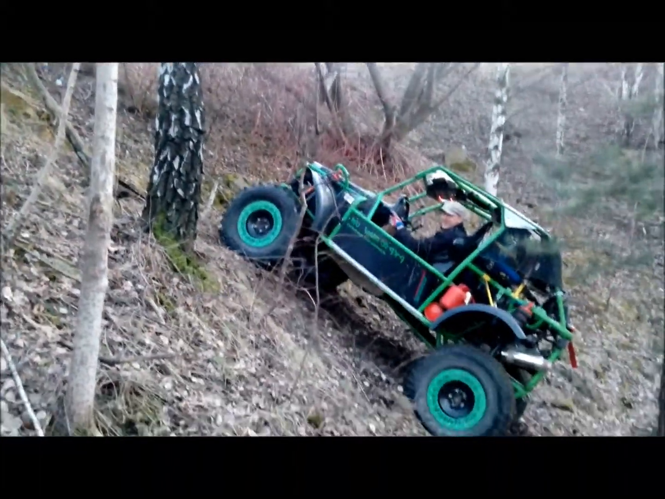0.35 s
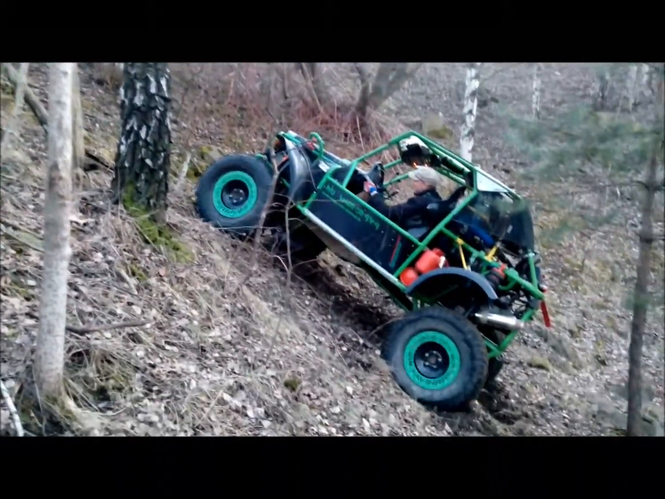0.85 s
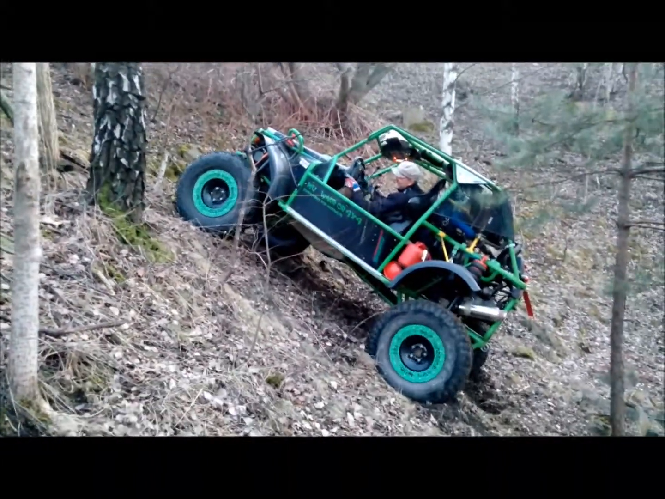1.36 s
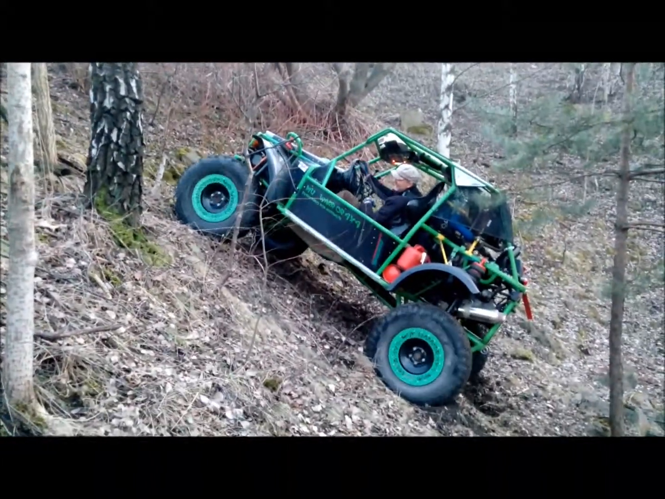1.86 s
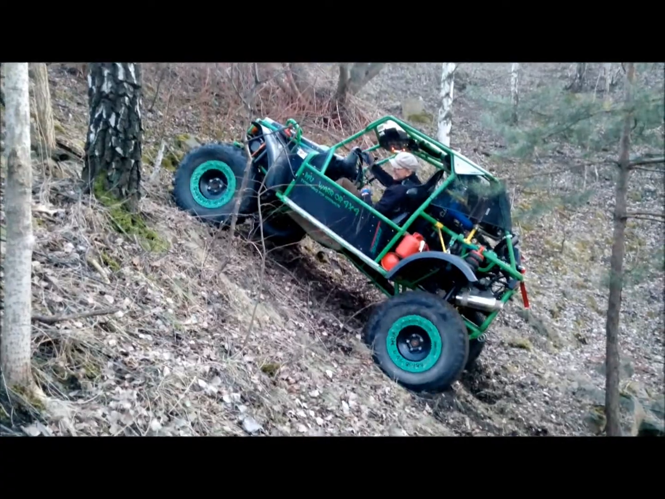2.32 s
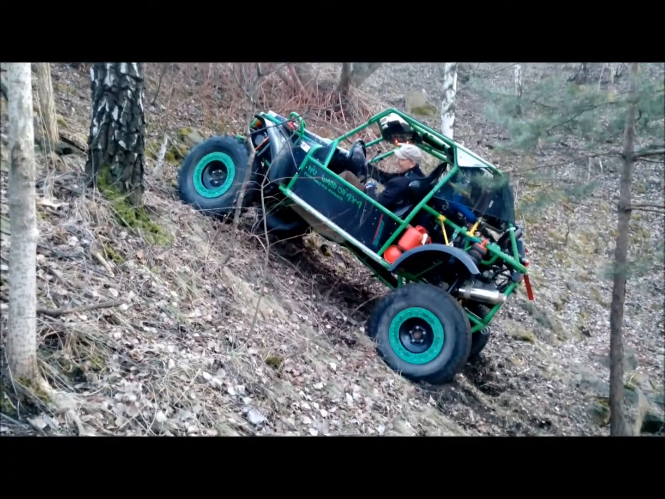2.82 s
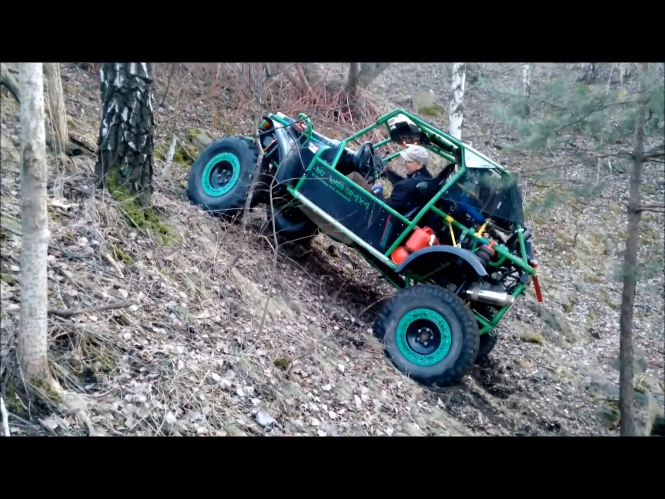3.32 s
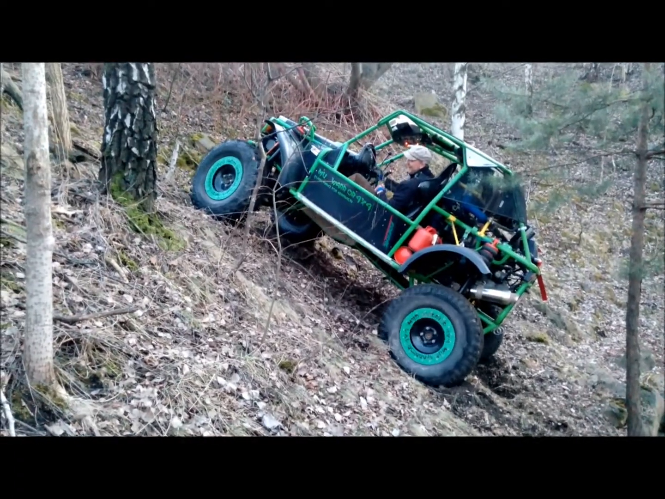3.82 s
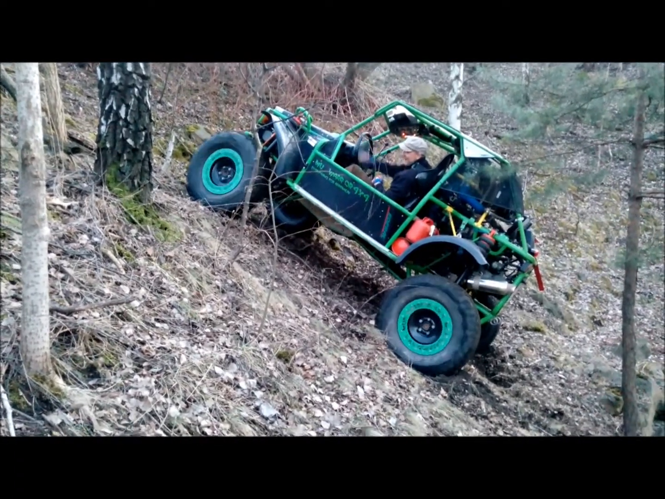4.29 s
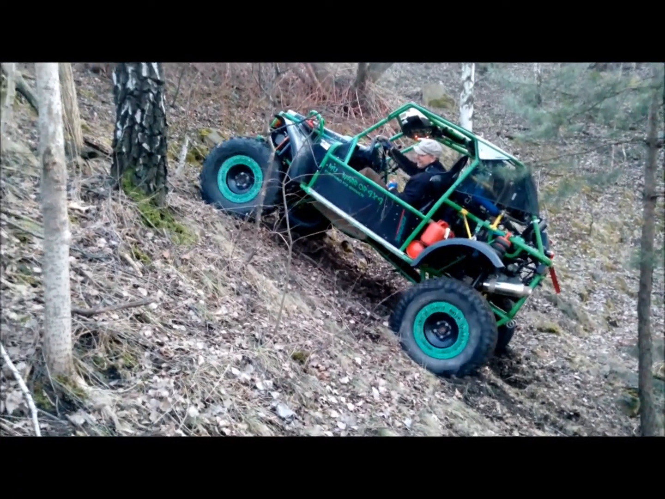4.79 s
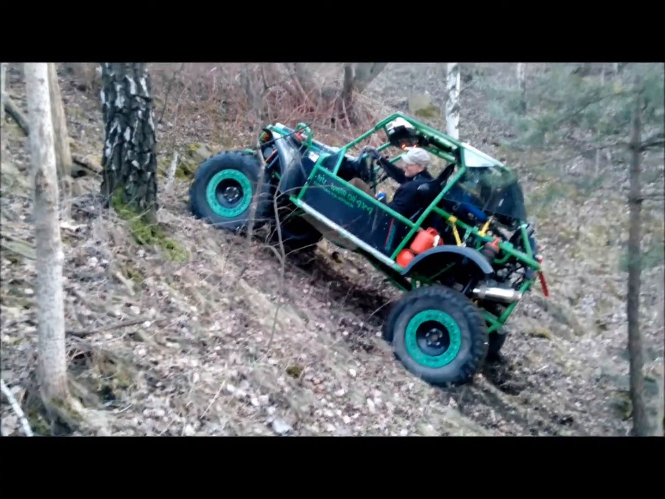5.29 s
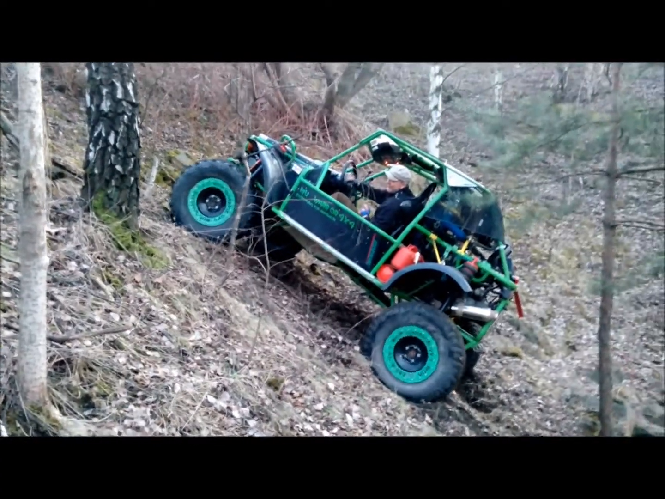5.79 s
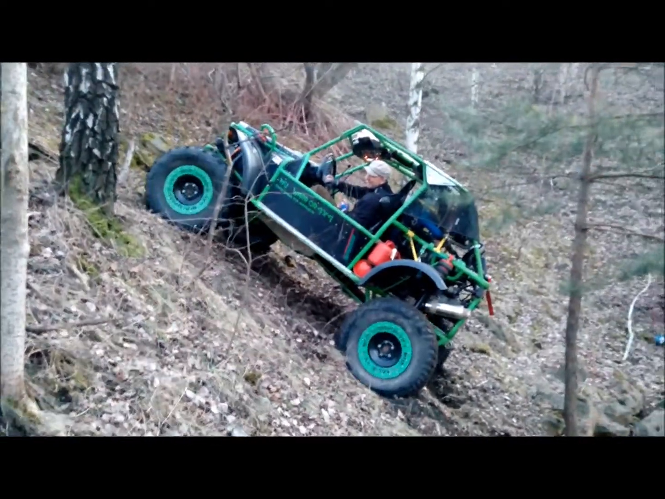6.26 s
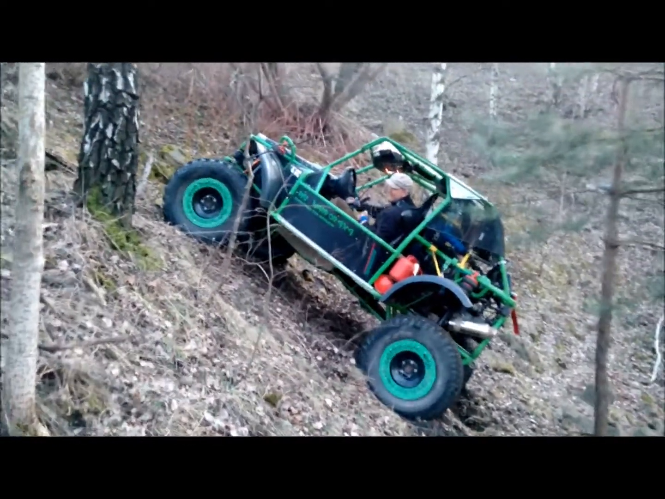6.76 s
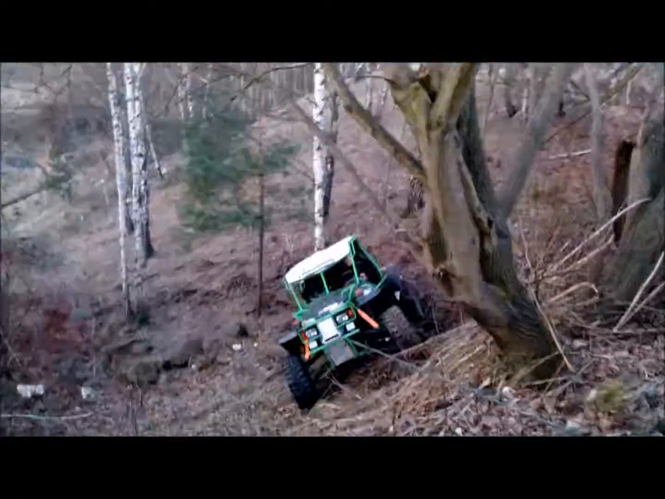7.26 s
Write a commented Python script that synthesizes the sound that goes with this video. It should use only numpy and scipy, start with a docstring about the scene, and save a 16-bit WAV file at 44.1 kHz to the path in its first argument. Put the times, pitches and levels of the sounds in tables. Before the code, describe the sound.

Starting already at high revs, an off-road engine drops, then climbs in several throttle surges, loudest around two to three seconds. Between them it slackens into slow, lumpy firing with clattering, ticking metal and thin gear whine. Later blips are shorter, and the rattle is more exposed. Loose metal knocks occur near the middle. Close outdoor mono microphone, brief tree reflections, soft treble hiss, sudden stop.

```python
"""A four-cylinder off-road buggy is blipped in surges on a steep wooded slope, a few metres away.
Each firing sends an impulse through the silencer's filter and bursts a puff of noise for the gas.
Random ticks and tooth tones drive the resonances of the rattling block; tooth overtones make a gear whine.
One firing count times all engine parts; sparse echoes, low rumble, loose knocks and a steady hiss surround it."""
import sys
import numpy as np
from scipy import signal
from scipy.io import wavfile
from scipy.ndimage import uniform_filter1d

SR = 44100
rng = np.random.default_rng(int(sys.argv[2]) if len(sys.argv) > 2 else 0)


def digitize_waveform(pressure):
    """Quantize a signal to 16-bit integers and store it at the path in sys.argv[1].

    Rows of a 2-D input are taken as channels; values are limited to [-1, 1].
    """
    field = np.atleast_2d(pressure).T
    bounded = np.clip(field, -1, 1)
    quanta = np.round(bounded * 32767).astype(np.int16)
    wavfile.write(sys.argv[1], SR, quanta)


def boost_factor(decibels):
    """Convert a level in decibels to a linear amplitude factor."""
    exponent = np.asarray(decibels, float) / 20
    return 10 ** exponent


N = 325438  # samples

TEETH_PER_FIRING = 5.75  # gear teeth that mesh in one firing interval


def evened(x):
    """Power normalisation: scales to rms 1."""
    return x / np.sqrt(np.mean(x ** 2) + 1e-20)


def read(points, hz):
    """Interpolates a spectrum on a log-frequency axis."""
    f, value = np.transpose(points)
    return np.interp(np.log(hz + 1), np.log(f + 1), value)


def colour(x, points):
    """Minimum-phase filter: the phase of a causal response follows from its log gain."""
    log_gain = np.log(boost_factor(read(points, abs(np.fft.fftfreq(2 ** 14, 1 / SR)))))
    spectrum = np.exp(np.conj(signal.hilbert(log_gain)))
    taps = np.fft.ifft(spectrum).real[:2 ** 12]
    return signal.oaconvolve(x, taps)[:N]


def resonate(x, hz, width):
    """Resonance of gain 1 by heterodyning: shifts hz down to zero, smooths, and shifts back."""
    turn = np.exp(2j * np.pi * np.cumsum(hz * np.ones(len(x))) / SR)
    r = np.exp(-np.pi * width / SR)
    return 2 * (turn * signal.lfilter([1 - r], [1, -r], x / turn)).real


def wander(seconds):
    """Slow random fluctuation of rms 1: white noise averaged twice over a window."""
    window = int(seconds * SR)
    return evened(uniform_filter1d(uniform_filter1d(rng.standard_normal(N), window), window))


def obey(law, thump_db, speed):
    """Source-strength law: the level of a layer follows load, speed and acceleration."""
    mid_speed, mid_thump_db = 45, -25  # firings per s and load at which the law gives its first column
    db, per_load, per_speed, per_gain = law
    gain = uniform_filter1d(np.gradient(speed) * SR, SR // 20)  # firings/s gained each s
    speed_db = 20 * np.log10(speed / mid_speed)
    return db + per_load * (thump_db - mid_thump_db) + per_speed * speed_db + per_gain * gain


def air(t):
    """Stationary filtered noise makes a steady treble hiss; one decaying noise burst makes a thin tick."""
    # spectrum of the hiss: hz, relative_db (per Hz)
    hiss_points = [(5000, -32), (7500, -1), (10000, -9), (13000, -13), (15600, -22)]
    # the tick in the top treble: start_s, peak_db, pitch_hz, t60_s
    tick_row = (7.056, -46, 14000, .02)
    s, db, hz, t60 = tick_row
    burst = rng.standard_normal(N) * (t > s) * boost_factor(-60 * abs(t - s) / t60)
    tick = resonate(burst, hz, .2 * hz)
    hiss = evened(colour(rng.standard_normal(N), hiss_points))
    return boost_factor(-73.5) * hiss + boost_factor(db) * tick / abs(tick).max()


def trees(x):
    """Scattering: sparse echoes from trunks and slope, as convolution with decaying random impulses."""
    t = np.arange(SR // 2) / SR
    sparse = (rng.random(len(t)) < .04) * (t > .008)  # the first echo comes after 8 ms
    taps = rng.choice([-1., 1.], len(t)) * sparse * boost_factor(-60 * t / 0.071)  # t60 71 ms
    return signal.oaconvolve(x, taps / np.linalg.norm(taps))[:N]


def slope(x):
    """Interference: the echo off the slope cancels a band of the treble."""
    # gain of direct sound plus echo: hz, gain_db
    slope_points = [(3000, 1.5), (3750, -2.5), (4150, -6), (4600, -8), (5500, -4)]
    return colour(x, slope_points)


def rumble(thump_db):
    """Turbulent gas buffeting: noise through two low resonances, stronger under load."""
    centre_hz, width_hz = 27, 22
    lumps = resonate(resonate(rng.standard_normal(N), centre_hz, width_hz), centre_hz, width_hz)
    return boost_factor(0.63 * thump_db - 27.0 + 4.0 * wander(0.019)) * evened(lumps)


def knocks():
    """Impact response of loose metal: each knock is a short crack of noise that rings briefly."""
    # loose metal knocks: start_s, peak_db (ahead of echoes and slope), ring_hz
    knock_rows = [(1.4894, -39, 2560), (4.171, -36, 3410), (4.2038, -32, 3364), (5.6491, -38, 2660)]
    out, t = np.zeros(N + 4000), np.arange(4000) / SR
    for s, db, hz in knock_rows:
        crack = rng.standard_normal(4000) * boost_factor(-60 * t / 0.014)
        tail = .4 * np.sin(2 * np.pi * hz * t) * boost_factor(-60 * t / .06)
        ring = resonate(resonate(crack, hz, .2 * hz), hz, .3 * hz) + tail
        out[round(s * SR):][:4000] += boost_factor(db) * ring / abs(ring).max()
    return out[:N]


def overtone(turns, multiple, db, waver_db):
    """Mesh harmonic: one overtone of the tooth rate, wavering in strength and phase."""
    phase = 2 * np.pi * TEETH_PER_FIRING * round(multiple) * turns + 1.7 * wander(.008)
    return np.sqrt(2) * boost_factor(db + waver_db * wander(0.027)) * np.cos(phase)


def whine(speed, turns):
    """Order tracking through a fixed filter: tooth overtones sing where the casing favours them."""
    # the three strong overtones of the tooth rate: multiple, relative_db
    strong_overtones = [(6, -2), (8, 1.5), (10, -6)]
    # what the gear casing lets out, ahead of the load law: hz, gain_db
    casing_points = [(900, -63.5), (1300, -63.5), (1500, -62.5), (1700, -52.5), (1850, -55), (2100, -53),
                     (2350, -58.5), (2570, -52.5), (2750, -67), (3200, -60), (3480, -50), (3700, -67)]
    out = np.zeros(N)
    for k, db in strong_overtones:
        casing_db = read(casing_points, TEETH_PER_FIRING * round(k) * speed)
        out += overtone(turns, k, db + casing_db, 4.7)
    return out


def block(drive, flicker_db):
    """Modal resonance: the block rings at its own pitches, each coming and going."""
    # ringing parts of the block: pitch_hz, width_hz, relative_db
    block_modes = [(508, 28, -8.5), (973, 130, -8.5), (1654, 23, -2), (2054, 150, 0.5), (2248, 37, -9.5),
                   (2650, 220, -8.5), (3370, 130, -5), (3720, 65, -10.5), (4670, 57, -14), (4730, 54, -23),
                   (5140, 34, -25), (5650, 52, -16), (7340, 130, -8.5), (8000, 90, -37), (9200, 120, -30)]
    rings = np.zeros(N)
    for hz, width, db in block_modes:
        rings += boost_factor(db + flicker_db * wander(0.073)) * resonate(drive, hz, width) * np.sqrt(SR / width)
    # the block's ringing holds nothing above about 10 kHz
    return evened(signal.sosfilt(signal.butter(6, 9800, fs=SR, output="sos"), rings))


def rattle(turns, rattle_db):
    """Random impact excitation: dense ticks, bunched by the firing cycle, and tooth tones ring the block."""
    # spectrum of the rattle's hiss: hz, relative_db
    rattle_points = [(140, -31.5), (230, 2), (390, -11), (580, -3.5), (680, -11), (1000, -14),
                     (1300, -13.5), (1750, -8), (2900, -20.5), (4000, -19.5), (4750, -6), (5800, -5),
                     (6600, -18), (8100, -29), (12000, -88), (16000, -83)]
    # faint overtones of the tooth rate: multiple, relative_db
    faint_overtones = [(7, 0), (11, 1.5), (14, -1.5), (15, 0.5), (16, 1.5), (17, -11), (18, -0.5),
                       (20, -12), (22, 2), (24, -7)]
    beat = 1 + 0.17 * np.cos(2 * np.pi * (turns - .12))
    sizes = boost_factor(1.3 * np.minimum(rng.exponential(1, N), 4))
    struck = rng.random(N) < 1200 / SR  # 1200 ticks per s on average
    ticks = evened(struck * sizes * rng.choice([-1., 1.], N) * beat)
    mesh = evened(sum(overtone(turns, k, db, 4.4) for k, db in faint_overtones))
    hiss = colour(beat * rng.standard_normal(N) + 0.13 * ticks + 0.37 * mesh, rattle_points)
    rings = block(ticks + .15 * mesh, 4.0)
    return boost_factor(rattle_db) * (boost_factor(4.5) * evened(hiss) + boost_factor(-5.5) * rings)


def boom(speed, turns):
    """Forced resonance: the body booms at the firing rate, its level and phase lag set by speed alone."""
    # body boom: firings_per_s, level_db (rms)
    boom_points = [(41, -52), (45, -53), (48, -33), (55, -26.5), (63, -32)]
    lag = (speed - 45) * .019  # firing intervals, growing as the speed climbs through the resonance
    tone = np.sqrt(2) * boost_factor(read(boom_points, speed)) * np.cos(2 * np.pi * (turns - lag))
    return tone * np.clip((speed - 34) / 7, 0, 1)  # silent near idle


def rasps(t):
    """Jet-noise surges: short spells of rougher gas change the dB of puff and fizz, fading in and out."""
    # spells of rougher gas: start_s, length_s, puff_change_db, fizz_change_db
    rasp_rows = [(-.05, 0.1, 8.5, 16), (2.08, 0.207, 2.5, 7), (2.885, 0.13, 3, 10.5), (3.966, 0.12, 6, 3),
                 (4.54, 0.046, 1.5, 4), (5.643, 0.052, 2.5, 6), (6.472, 0.23, 3.5, -3)]
    edge_s = 0.034
    start, length, *change = np.transpose(rasp_rows)
    inside_s = np.minimum(t[:, None] - start, start + length - t[:, None])
    on = np.clip(inside_s / edge_s + .5, 0, 1)
    return np.array(change) @ on.T


def puffs(since, firing, puff_db, fizz_db, spread):
    """Pulsed jet noise: gas bursts as each valve opens, dies in a few ms and shakes the block."""
    # spectrum of the puff: hz, relative_db (per Hz)
    puff_points = [(140, -35), (230, 4.5), (330, -8), (408, -4), (443, -4), (505, 1.5), (656, -1.5),
                   (1000, -5), (1440, -12.5), (1670, -8.5), (2810, -22.5), (3480, -10), (4240, -32.5),
                   (5980, -13), (11500, -36), (15000, -65), (22000, -120)]
    # spectrum of the fizz in its treble: hz, relative_db (per Hz)
    fizz_points = [(7000, -57), (10500, 2.5), (12000, -1), (14400, -1), (15600, -10)]
    late = np.maximum(since - .0004, 0)  # s, counted from 0.4 ms after the firing
    burst = late / .0008 * np.exp(-late / .002) * boost_factor(2.2 * spread[firing])
    gas = evened(.19 + burst) * rng.standard_normal(N)
    # the repeatable crack of the valve gives a few clear harmonics
    gas -= 0.5 * evened(np.diff(firing, prepend=0) * 1.)
    sharp = evened(0.061 + burst ** 2.43) * rng.standard_normal(N)
    bark = evened(colour(gas, puff_points)) + boost_factor(-6.5) * block(sharp, 3.0)
    fizz = evened(colour(sharp, fizz_points))
    return bark * boost_factor(puff_db - 2.0) + fizz * boost_factor(fizz_db + 4.5)


def thumps(firing, speed, thump_db, spread):
    """Impulse response: one negative pressure impulse per firing through the silencer; weak ones are uneven."""
    # strength of each cylinder in firing order, at light load: relative_db
    cylinder_db = [-4.7, -6.5, -2.3, -3.4]
    # silencer and pipe, as heard on one thump: hz, relative_db
    silencer_points = [(12, 1), (30, -24), (45, -11), (56, -0.5), (70, 6), (85, 6), (100, 5.5), (130, 2),
                       (155, 3.5), (185, -7), (210, -12), (270, -43.5), (400, -29.5), (900, -106),
                       (3000, -100)]
    at = np.flatnonzero(np.diff(firing, prepend=0))
    light = np.clip((-19 - thump_db[at]) / 9, .12, 1)  # 1 at light load
    uneven_db = np.take(cylinder_db, firing[at] % 4) + 2.96 * spread[firing[at]]
    kick = np.zeros(N)
    kick[at] = -boost_factor(thump_db[at] + light * uneven_db)
    kick /= np.sqrt(speed)  # same power whatever the rate
    return boost_factor(68) * colour(kick, silencer_points)


def scene():
    """Phase locking: all engine parts share one crankshaft, counted in firing intervals."""
    # engine speed ahead of smoothing: time_s, firings_per_s
    speed_points = [(0.0, 61.96), (0.37, 42.77), (0.58, 40.22), (1.3, 55.75), (1.55, 55.82), (1.83, 35.92),
                    (2.0, 36.97), (2.23, 62.4), (2.37, 62.33), (2.62, 46.16), (2.79, 46.91), (2.99, 64.59),
                    (3.22, 54.91), (3.37, 41.81), (3.73, 29.13), (4.1, 27.33), (4.25, 31.35), (4.47, 46.87),
                    (4.69, 53.63), (5.45, 26.85), (5.8, 45.03), (6.23, 23.87), (6.41, 26.23), (6.79, 49.78),
                    (7.15, 29.99), (7.38, 39.86)]
    # how hard the engine fires: time_s, thump_db
    load_points = [(0.0, -16.5), (0.04, -20.5), (0.08, -25), (0.24, -31.5), (0.96, -18), (1.41, -21),
                   (1.74, -37), (1.88, -29), (2.05, -19), (2.15, -14.5), (2.27, -14.5), (2.45, -31),
                   (2.6, -30.5), (2.76, -18.5), (2.97, -12.5), (3.25, -35), (3.62, -28), (4.13, -28),
                   (4.17, -24), (4.36, -21.5), (4.4, -18.5), (4.56, -15.5), (4.67, -22), (4.89, -24.5),
                   (4.93, -31.5), (5.49, -28), (5.69, -19), (5.75, -20), (5.83, -27.5), (6.02, -40.5),
                   (6.32, -30.5), (6.63, -18), (6.74, -16.5), (6.88, -24.5), (6.94, -37), (7.02, -35),
                   (7.19, -28.5), (7.35, -15)]
    # slow drift of the rattle about its law: time_s, change_db
    drift_points = [(0, 1), (.6, -0.5), (1.4, -0.5), (2, 0), (2.4, 1.5), (2.7, -0.5), (3.2, 1.5),
                    (3.7, 0.5), (4.3, 0.5), (4.8, 0.), (5.6, 1), (5.85, 4.5), (6.05, 2.5), (6.3, 4.5),
                    (6.6, 3), (7.1, 5), (7.38, 1)]
    # laws of the layers, ahead of each layer's own gains: base_db (at mid speed and load),
    # db_per_db_of_load, db_per_db_of_speed, db_per_acceleration (dB per firing/s gained each s)
    puff_law = (-45.5, 1.1422, 0, 0.0566)
    fizz_law = (-95.5, 1.7, 3.5, 0.0755)
    rattle_law = (-47, 0.2237, 2, 0.0022)
    whine_law = (0., 0.16, 0.16, 0.0077)
    flywheel_s = .13  # the flywheel rounds every change of speed
    start_turn = .381  # part of a firing interval already gone at the start

    t = np.arange(N) / SR
    speed = np.interp(t, *np.transpose(speed_points))
    speed = uniform_filter1d(speed, round(flywheel_s * SR), mode="nearest")
    thump_db = np.interp(t, *np.transpose(load_points))
    turns = start_turn + np.cumsum(speed) / SR  # firing intervals
    firing = turns.astype(int)
    since = turns % 1 / speed  # s since the last firing
    spread = rng.standard_normal((firing[-1] + 1, 2)).T  # chance of each firing: puff, thump

    puff_change_db, fizz_change_db = rasps(t)
    puff_db = obey(puff_law, thump_db, speed) + puff_change_db
    fizz_db = obey(fizz_law, thump_db, speed) + fizz_change_db
    fizz_db = 20 * np.log10(boost_factor(fizz_db) + boost_factor(-79))  # a floor under the fizz
    rattle_db = obey(rattle_law, thump_db, speed) + np.interp(t, *np.transpose(drift_points))

    bright = puffs(since, firing, puff_db, fizz_db, spread[0]) + knocks()
    bright += rattle(turns, rattle_db)
    bright += whine(speed, turns) * boost_factor(obey(whine_law, thump_db, speed))
    bright = slope(bright + boost_factor(-9.0) * trees(bright))
    low = thumps(firing, speed, thump_db, spread[1]) + boom(speed, turns) + rumble(thump_db)
    return (low + bright + air(t))[None]


def top_cut(x):
    """Nothing passes above the cut-off."""
    return signal.sosfilt(signal.butter(12, 15710, fs=SR, output="sos"), x)


def record(dry):
    """High-pass pressure response: the microphone blocks steady pressure; the sound stops just before the end."""
    end_s = 7.362
    heard = signal.sosfilt(signal.butter(1, 4, "high", fs=SR, output="sos"), dry)
    fade = np.clip((end_s * SR - np.arange(N)) / 60, .002, 1)  # over 60 samples
    return top_cut(heard * fade)


dry = scene()
out = record(dry)
digitize_waveform(out)
```